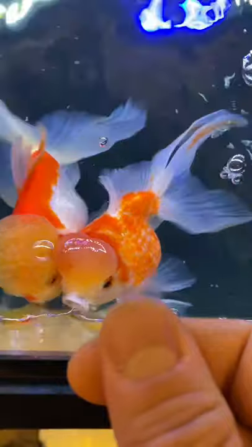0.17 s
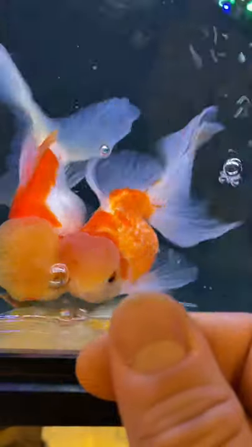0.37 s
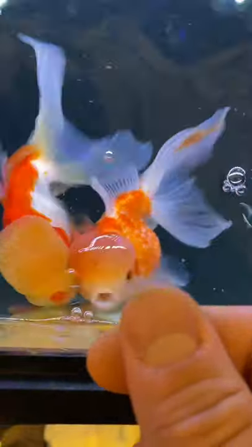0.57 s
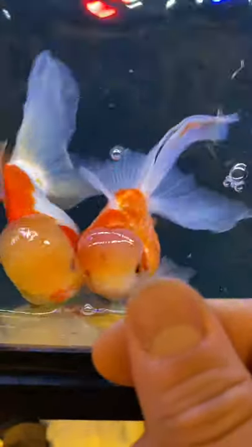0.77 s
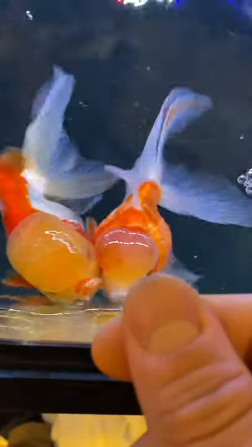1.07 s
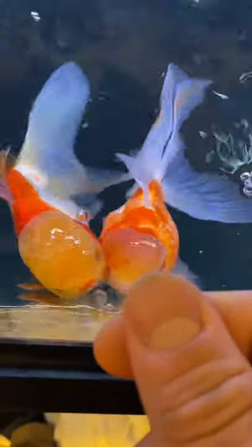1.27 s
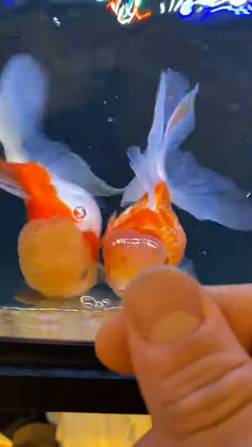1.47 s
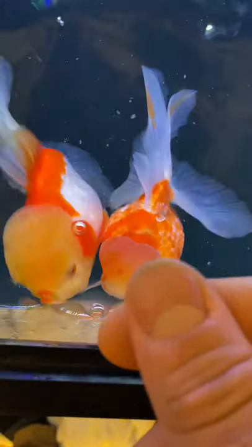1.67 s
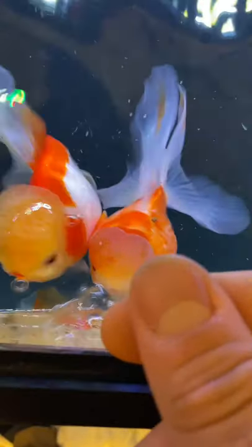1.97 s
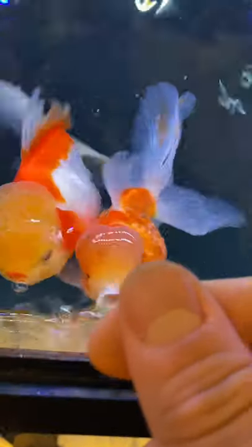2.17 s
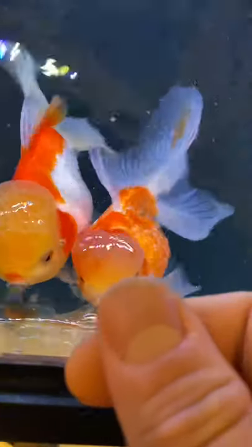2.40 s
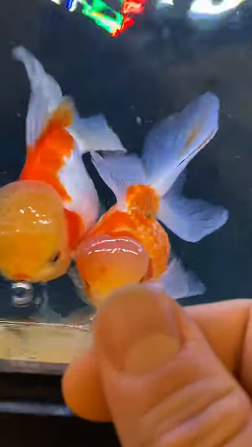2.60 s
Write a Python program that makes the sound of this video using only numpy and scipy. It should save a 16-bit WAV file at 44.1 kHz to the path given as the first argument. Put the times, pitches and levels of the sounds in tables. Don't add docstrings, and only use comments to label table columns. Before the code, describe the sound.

A fish tank air pump throbs low and steady with a slight casing buzz, while filter water trickles, small bubbles fizz, tick and pop, over dull room rumble, heard close to the glass by a phone.

```python
import sys
import numpy as np
from scipy import signal
from scipy.fft import rfft, irfft
from scipy.io import wavfile
from scipy.ndimage import uniform_filter1d

SR = 44100
rng = np.random.default_rng(int(sys.argv[2]) if len(sys.argv) > 2 else 0)


def dump(signal):
    limited = np.clip(np.atleast_2d(signal).T, -1, 1)
    pcm = np.round(limited * 32767).astype(np.int16)
    wavfile.write(sys.argv[1], SR, pcm)


def attenuation_scalar(level_db):
    decades = np.asarray(level_db, float) / 20
    return 10 ** decades


N = 120834

# pitch_hz, level_db (per Hz)
RUMBLE_SPECTRUM = [(30, -2), (100, 2), (200, -3), (270, -8), (330, -15.5), (700, -14.5), (900, -23.5),
                   (1300, -23)]
# pitch_hz, likeness (0 to 1)
RUMBLE_LIKENESS = [(40, .99997), (120, .975), (260, .88), (540, .82), (1100, .1), (2000, .05)]
# pitch_hz, level_db (per Hz)
HISS_SPECTRUM = [(900, -7), (1700, -3), (3000, 1.5), (4200, -2), (5200, -1), (6500, -5.5), (7500, -8.5),
                 (9500, -8.5)]
# start_s, level_db, pitch_hz
BURSTING_BUBBLES = [(.216, -41.5, 1160), (.2175, -40, 1980), (.737, -40, 736), (.740, -34.5, 1010),
                    (.744, -42, 820), (.743, -40, 1390), (.7365, -37, 1240), (.746, -43, 3160),
                    (.94, -47, 516), (1.132, -38, 1440), (1.198, -37, 590), (1.2035, -42, 590),
                    (1.6615, -32, 1370), (1.662, -34, 1040), (1.678, -42.5, 1010), (1.691, -44, 1480),
                    (1.8, -34.5, 488), (1.805, -44, 483), (1.972, -42.5, 1260), (2.377, -41, 785),
                    (.815, -37, 194), (.96, -32, 197), (.235, -35.5, 98), (.3, -36, 97), (.955, -35, 100),
                    (1.37, -59, 111)]
# start_s, level_db, pitch_hz
FIZZ_BUBBLES = [(0.124, -48.5, 4310), (0.133, -44, 3590), (0.303, -54, 1950), (0.243, -44.5, 4560),
                (0.386, -45.5, 4900), (0.514, -50.5, 2870), (0.556, -47, 4800), (0.647, -37.5, 5300),
                (0.745, -60, 3630), (0.824, -40.5, 2790), (0.862, -43, 3270), (0.884, -49.5, 4760),
                (1.155, -47.5, 3370), (1.202, -45.5, 4310), (1.514, -46.5, 3840), (1.5145, -45, 2046),
                (1.607, -48, 5000), (1.662, -45.5, 2600), (1.771, -49, 5400), (1.829, -51, 4800),
                (1.908, -41, 2430), (1.928, -45, 5550), (2.072, -46.5, 5190), (2.132, -45, 4600),
                (2.133, -43, 5600), (2.36, -48.5, 3030), (2.424, -51, 4820), (2.472, -39.5, 5230),
                (2.522, -45.5, 3930), (2.553, -45, 5510), (0.483, -53, 1820), (0.957, -55, 2350),
                (1.097, -58, 2600), (1.127, -50.5, 2080), (1.497, -62, 2100), (1.553, -54, 2020),
                (1.687, -54, 2360), (1.74, -60, 2540), (1.799, -59, 1930), (1.846, -62, 1920),
                (1.981, -47.5, 2800), (2.03, -62, 2340), (2.097, -59, 2240), (2.215, -62, 2230),
                (2.276, -60, 1930), (2.521, -50, 1920), (0.362, -51, 4640), (0.526, -50.5, 4600),
                (0.98, -55, 4200), (2.35, -47, 4700)]
# start_s, level_db, pitch_hz
TICKING_BUBBLES = [(0.06, -50.5, 6130), (0.464, -60, 9100), (0.636, -60, 5940), (0.663, -46.5, 9700),
                   (0.724, -54, 9100), (0.755, -45.5, 6170), (1.098, -53, 8130), (1.166, -52, 8400),
                   (1.187, -48.5, 8230), (1.201, -46, 10150), (1.202, -54, 8690), (1.21, -51, 8040),
                   (1.244, -45.5, 6670), (1.254, -52.5, 9200), (1.379, -49, 8880), (1.484, -49.5, 5750),
                   (1.595, -52, 6970), (1.661, -48, 6550), (1.772, -47.5, 5840), (1.828, -49.5, 7200),
                   (1.876, -57, 8600), (1.928, -50, 5830), (1.993, -51.5, 8340), (2.132, -45.5, 6280),
                   (2.331, -54, 8500), (2.471, -53, 5900), (2.513, -48.5, 8200), (2.549, -54, 8550),
                   (2.551, -49, 6930), (2.552, -49.5, 6180), (0.1137, -57.5, 8860), (0.1486, -62, 7100),
                   (0.1715, -54, 7750), (0.399, -57.5, 8570), (0.4973, -58, 9500), (0.5282, -58, 8440),
                   (0.7861, -56, 6800), (0.8041, -54.5, 8970), (0.8864, -57, 8600), (1.505, -53.5, 9700),
                   (1.514, -53, 7100), (1.5334, -56, 6940), (1.7574, -56, 6500), (1.8083, -57.5, 9140),
                   (1.9006, -59, 7060), (1.9749, -57, 8540), (2.0677, -55, 6630), (2.1021, -64, 9160),
                   (2.1181, -59.5, 8170), (2.1989, -53.5, 6740), (2.2224, -54, 7170), (2.2413, -58, 7960),
                   (2.2753, -58, 8400), (2.39, -57, 7700), (2.5367, -52, 8500), (2.592, -54, 6510),
                   (2.6529, -66, 9300), (2.325, -55, 6200), (1.128, -60, 6900)]
# start_s, level_db
FILM_SNAPS = [(.047, -30), (0.398, -40.5), (0.466, -31), (.7244, -44), (1.3794, -38), (1.712, -37.5),
              (1.993, -28), (2.1182, -50), (2.242, -48), (2.3901, -45)]
# start_s, level_db, pitch_hz
HOLLOW_POPS = [(.2172, -36, 1500), (0.8, -31.5, 2000), (.7552, -37.5, 4700), (0.65, -41, 3400),
               (.8245, -36, 2510), (1.1, -37, 810), (1.5142, -35, 2900), (1.8005, -34.5, 660),
               (2.1324, -39, 4600), (2.4718, -45, 4600), (.5555, -41.5, 5000), (1.907, -39, 2600),
               (0.84, -42, 2700), (1.09, -42.5, 5000), (2.0715, -43, 5100), (2.4235, -44, 4900),
               (2.335, -43, 5200), (1.9, -41, 1900)]
# start_s, level_db, pitch_hz
SINGING_BUBBLES = [
    (.644, -41, 6000),
    (.784, -47, 2200),
    (1.578, -49, 2900),
    (.817, -47, 2950),
    (.829, -47.5, 3600),
    (.222, -49, 2550),
    (0.068, -49, 2200),
]
# pitch_hz, level_db
COMB_SPECTRUM = [(330, -1.5), (750, -14), (870, -9), (1000, -11), (1150, -0.5), (1520, 4), (1620, -5),
                 (1950, -5)]
# pitch_hz, level_db (rms)
CASING_BUZZ = [(420, -66), (630, -65.5), (690, -69), (840, -66.5), (870, -71.5), (900, -68), (1050, -71.5),
               (1110, -65.5), (1140, -70.5), (1170, -68), (1290, -64), (1470, -72), (1500, -78.5),
               (1530, -70)]
# multiple (of stroke rate), level_db
PUMP_ORDERS = [(1, 0), (2, -3.5), (3, -8.5), (4, -26.5), (5, -15.5), (6, -40.5), (7, -25.5), (8, -22),
               (9, -12), (10, -66)]

STROKE_HZ, STROKE_S = 30.0, 1 / 60


def rms_one(x):
    return x / np.sqrt(np.mean(x ** 2) + 1e-20)


def at_hz(points, hz):
    table_hz, value = np.array(points).T
    return np.interp(np.log(hz), np.log(table_hz), value)


def drift(rate_hz):
    r = np.exp(-80 * np.pi * rate_hz / SR)
    slow = signal.lfilter([1], [1, -2 * r, r * r], rng.standard_normal(N // 40 + 2002))[2000:]
    return np.interp(np.arange(N) / 40, np.arange(len(slow)), rms_one(slow))


def delayed(x, lag_s):
    hz = np.fft.rfftfreq(N, 1 / SR)
    return irfft(rfft(x) * np.exp(-2j * np.pi * hz * lag_s), N)


def banded_noise(spectrum, likeness, patchy_db, common_db, rate_hz):
    out = 0
    together = common_db * drift(rate_hz)
    lowest, highest = spectrum[0][0], spectrum[-1][0]
    edges = lowest * 2 ** np.arange(0, np.log2(highest / lowest) + .4, 1 / 3)
    white = rng.standard_normal((2, 2, N))
    for k, (low, high) in enumerate(zip(edges, edges[1:])):
        band = signal.butter(2, [low, high], "band", fs=SR, output="sos")
        mid, side = signal.sosfilt(band, white[k % 2])
        hz = np.sqrt(low * high)
        alike = np.clip(at_hz(likeness, hz), 0, 1)
        gain = attenuation_scalar(at_hz(spectrum, hz) + together + patchy_db * drift(rate_hz))
        out = out + gain * (np.sqrt(1 + alike) * mid + np.sqrt(1 - alike) * side * [[1], [-1]])
    return rms_one(out)


def bursts(rows, cycles, rise, lift_db):
    out = np.zeros(N + SR)
    chance = rng.uniform(1.0, 1.36, (len(rows), 2))
    for (start_s, db, hz), (long, steep) in zip(rows, chance):
        ring = cycles * long
        u = np.arange(int(4 * ring * SR / hz)) * hz / SR / ring
        bend = .5 * rise * steep
        turns = ring * ((1 - bend) * u + bend * u ** 2)
        shape = (1 - np.exp(-7 * u)) * np.exp(-u ** 2)
        i = int(start_s * SR)
        out[i:i + len(u)] += attenuation_scalar(db + lift_db) * shape * np.sin(2 * np.pi * turns)
    return out[:N]


def room_rumble():
    return attenuation_scalar(-44.5) * banded_noise(RUMBLE_SPECTRUM, RUMBLE_LIKENESS, patchy_db=1.8, common_db=.8, rate_hz=4)


def outflow_hiss():
    likeness = [(1000, .4), (3000, .78), (4600, .92), (8000, .97)]
    return attenuation_scalar(-56) * banded_noise(HISS_SPECTRUM, likeness, patchy_db=1.0, common_db=2.2, rate_hz=25)


def random_grains():
    grains_per_s, spread_db = 420, 2.5
    draw = rng.random((int(grains_per_s * N / SR), 3))
    start_s = draw[:, 0] * N / SR
    level_db = -spread_db * np.log(draw[:, 1] + .05)
    pitch_hz = 1700 * 5.5 ** draw[:, 2]
    return bursts(np.c_[start_s, level_db, pitch_hz], cycles=5.26, rise=0.12, lift_db=-56.5)


def splash_tail(pops):
    t60_s, tail_db, unlike = .06, -8, .2
    t = np.arange(int(t60_s * SR)) / SR
    noise = rng.standard_normal(len(t)) + unlike * rng.standard_normal((2, len(t)))
    tail = attenuation_scalar(-60 * t / t60_s) * (t > .002) * noise
    tail *= attenuation_scalar(tail_db) / np.sqrt(np.sum(tail[0] ** 2))
    return signal.fftconvolve(pops[None], tail, axes=1)[:, :N]


def outflow():
    pops = random_grains()
    pops += bursts(TICKING_BUBBLES, cycles=14.3, rise=0.13, lift_db=7.5)
    pops += bursts(BURSTING_BUBBLES, cycles=3.6, rise=.05, lift_db=0)
    pops += bursts(FIZZ_BUBBLES, cycles=8, rise=.08, lift_db=4)
    snaps = [(start_s, db, 7870) for start_s, db in FILM_SNAPS]
    pops += bursts(snaps, cycles=1.8, rise=.1, lift_db=0)
    water = pops + splash_tail(pops) + outflow_hiss()
    water[1] = delayed(water[1], .000103)
    aside = bursts(HOLLOW_POPS, cycles=1.2, rise=0.09, lift_db=-2.5)
    aside += bursts(SINGING_BUBBLES, cycles=18.0, rise=.03, lift_db=-3.5)
    return water + [aside, delayed(aside, .000065)]


def scattered_orders():
    comb_db, spread_db = -76, 3
    t, out = np.arange(N) / SR, 0
    sway = 0.0023 * drift(2.0)
    for k in range(11, 65):
        hz = k * STROKE_HZ
        db = comb_db + at_hz(COMB_SPECTRUM, hz) + spread_db * rng.standard_normal((2, 1))
        turns = hz * t + rng.random() + 0.34 * rng.standard_normal((2, 1))
        out = out + attenuation_scalar(db) * np.sin(2 * np.pi * turns + k * sway)
    return out


def casing():
    lean_db, turn_hz, wander = 7, 1230, .3
    t, out = np.arange(N) / SR, 0
    for hz, db in CASING_BUZZ:
        lean = np.array([[0], [-lean_db]] if hz < turn_hz else [[-lean_db], [0]])
        phase = rng.uniform(0, 2 * np.pi) + rng.normal(0, 1.0, (2, 1)) + wander * drift(2.1)
        hz = round(hz / STROKE_HZ) * STROKE_HZ
        level = attenuation_scalar(db + 4 + lean + 7.2 * wander * drift(3.6))
        out = out + level * np.sin(2 * np.pi * hz * t + phase)
    return out


def pump():
    throb_db, wander = -32, .09
    heave_lag_s, knock_lead_s = .0021, .0003
    right_turn_rad = .5
    t, out = np.arange(N) / SR - STROKE_S, 0
    for k, db in PUMP_ORDERS:
        k = round(k)
        lag = heave_lag_s if k <= 2 else -knock_lead_s * 3 / k
        turn = right_turn_rad * (k / 9) ** 2 * np.array([[-.5], [.5]])
        level = attenuation_scalar(throb_db + db - 2 * turn) * (1 + wander * drift(1.8))
        out = out + level * np.cos(2 * np.pi * k * STROKE_HZ * (t - lag) + turn)
    return out


def scene():
    return room_rumble() + outflow() + scattered_orders() + casing() + pump()


def joint_stereo(x):
    weak_db, sudden_db, sudden_hz, whole_s = -10.5, 7.6, 4300, .018
    pair = np.array([x[0] + x[1], x[0] - x[1]]) / 2
    hz, _, z = signal.stft(pair, SR, "cosine", 2048, 1024)
    band = ((hz - 10) // 345 + 1).astype(int)
    power = np.array([np.mean(abs(z[:, band == b]) ** 2, axis=1) for b in range(band[-1] + 1)])
    power = uniform_filter1d(power, size=3, axis=2)[band]
    for c in (0, 1):
        weak = power[:, c] < attenuation_scalar(2 * weak_db) * power[:, 1 - c]
        z[c] *= 1 - weak * (hz[:, None] > 3400)
    thinned = signal.istft(z, SR, "cosine", 2048, 1024)[1][:, :N]
    treble = signal.sosfilt(signal.butter(4, sudden_hz, "high", fs=SR, output="sos"), x[0])
    level = uniform_filter1d(treble ** 2, size=128)
    usual = signal.medfilt(level[::128], 41).repeat(128)[:N]
    sudden = level > attenuation_scalar(sudden_db) ** 2 * usual
    spread = signal.fftconvolve(1. * sudden, np.hanning(int(whole_s * SR)))[128:N + 128]
    keep = np.minimum(1, spread / 8)
    mid, side = thinned + keep * (pair - thinned)
    return np.array([mid + side, mid - side])


def top_cut(x):
    return signal.sosfilt(signal.butter(12, 10700, fs=SR, output="sos"), x)


def record(dry):
    start_s, fade_s, cutoff_hz = .033, .05, 9550
    fade = np.sin(np.pi / 2 * np.clip((np.arange(N) / SR - start_s) / fade_s, 0, 1)) ** 2
    cut = signal.sosfilt(signal.ellip(8, .5, 41, cutoff_hz, fs=SR, output="sos"), dry)
    mix = joint_stereo(fade * cut)
    return top_cut(mix)


dry = scene()
out = record(dry)
dump(out)
```